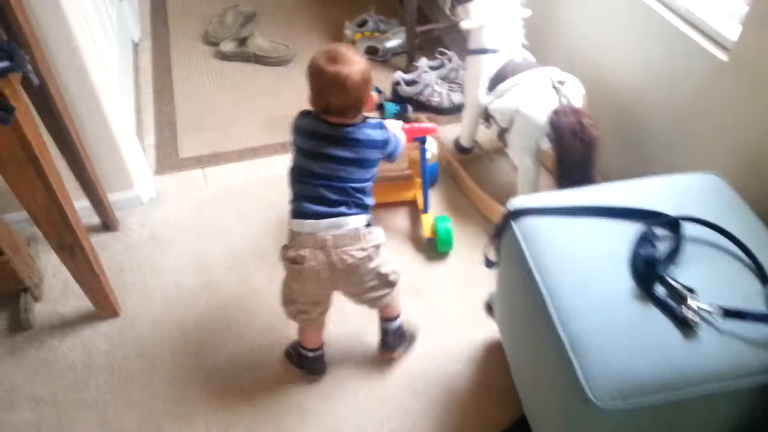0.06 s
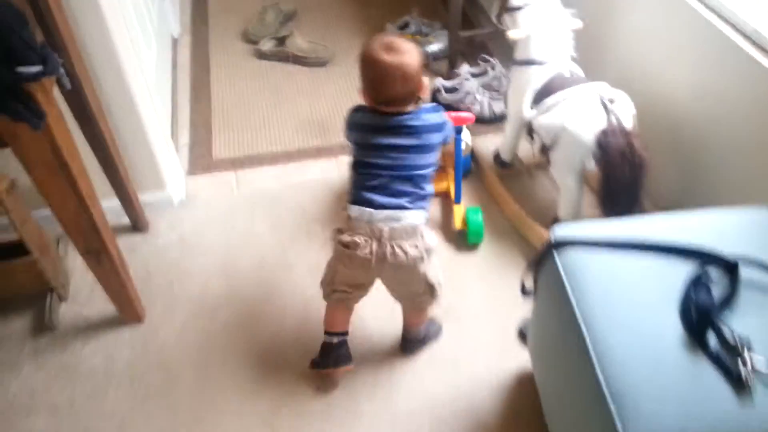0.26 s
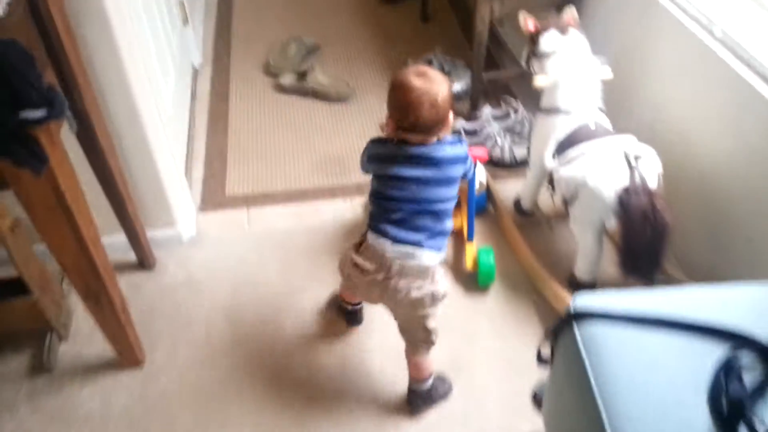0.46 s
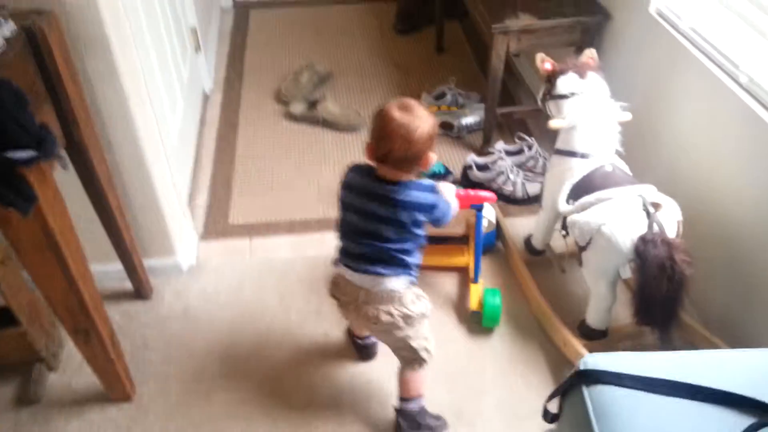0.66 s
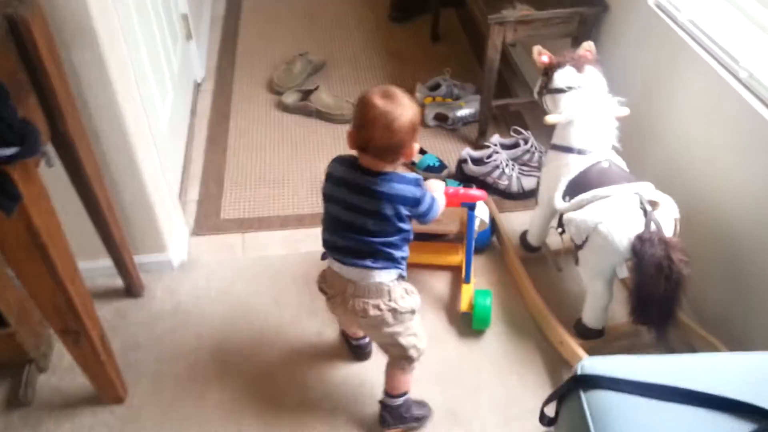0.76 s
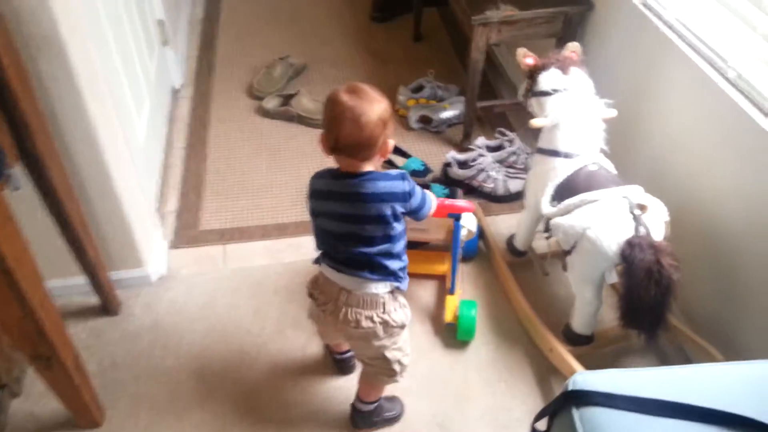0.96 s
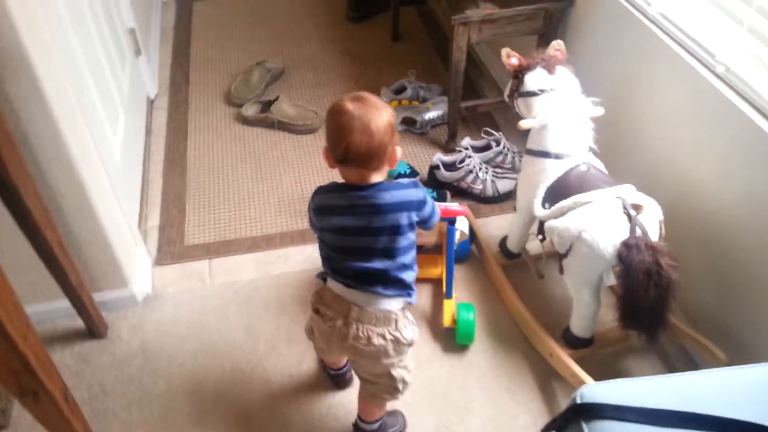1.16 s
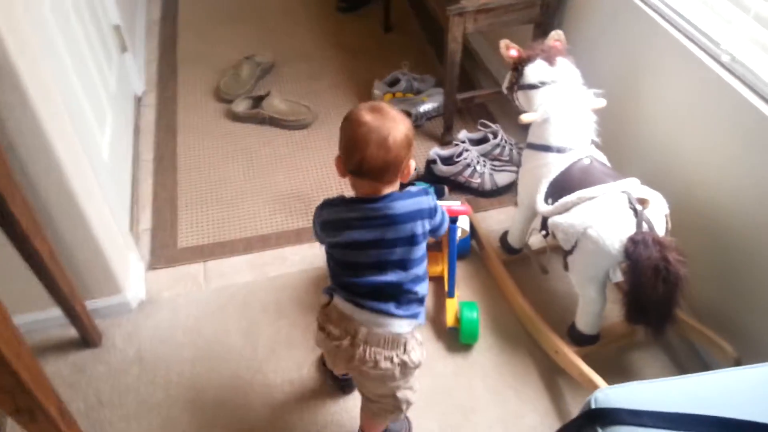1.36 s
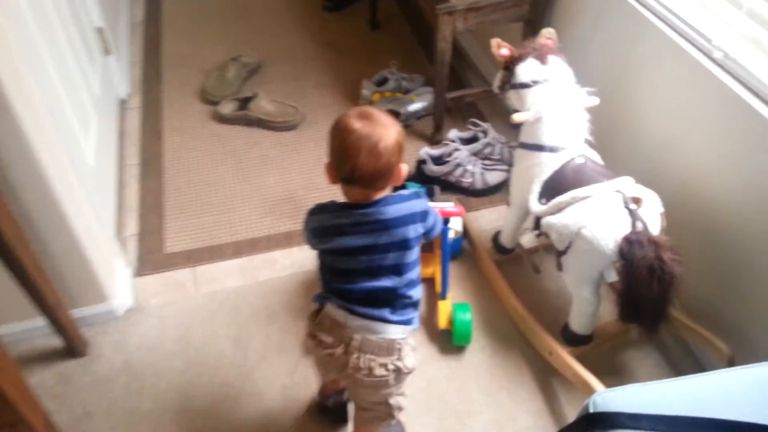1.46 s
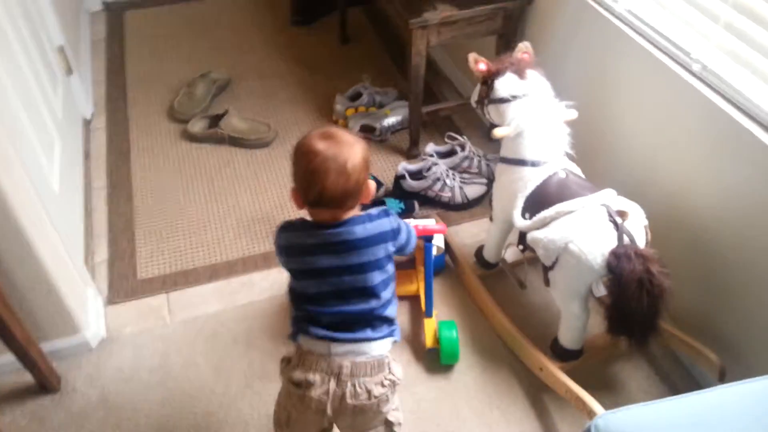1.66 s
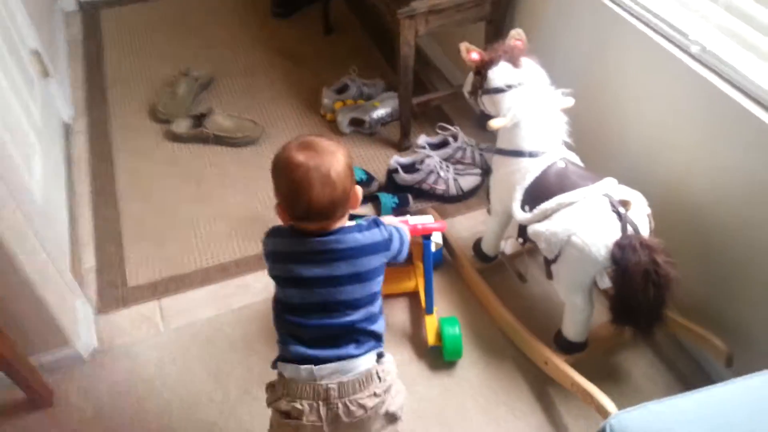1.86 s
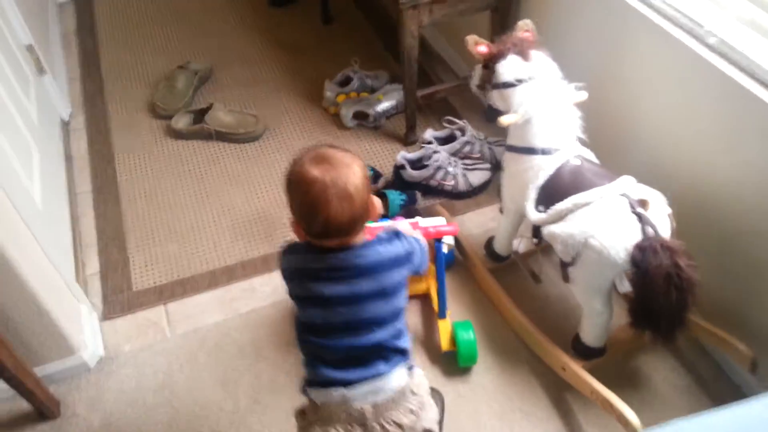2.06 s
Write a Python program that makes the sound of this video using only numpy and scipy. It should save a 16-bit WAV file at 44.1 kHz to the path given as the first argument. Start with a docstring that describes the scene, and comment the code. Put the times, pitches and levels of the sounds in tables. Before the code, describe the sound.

A toddler's rubber-soled shoes give four short, high squeaks in a small quiet room. Between them come soft footfalls, two brief rattles from a plastic push walker and faint scuffing, heard from close behind.

```python
"""A small quiet room: a toddler pushes a plastic walker across it, heard from just behind.
The shoes squeak four times as rubber sticks and slips. Soft footfalls ring the floor,
loose contacts rattle in the walker's hollow body, and wheels and soles scuff faintly.
Room air and a low hum lie underneath. Two close microphone ports give the stereo."""
import sys
import numpy as np
from scipy import signal
from scipy.fft import rfft, irfft
from scipy.io import wavfile

SR = 44100
rng = np.random.default_rng(int(sys.argv[2]) if len(sys.argv) > 2 else 0)


def digitize_waveform(pressure):
    """Quantize a signal to 16-bit integers and store it at the path in sys.argv[1].

    Rows of a 2-D input are taken as channels; values are limited to [-1, 1].
    """
    field = np.atleast_2d(pressure).T
    bounded = np.clip(field, -1, 1)
    quanta = np.round(bounded * 32767).astype(np.int16)
    wavfile.write(sys.argv[1], SR, quanta)


N = 92610

# Diffuse sound. Each row: frequency in Hz, left-right likeness from 0 to 1.
LIKENESS = [(50, 0.33), (250, 0.57), (600, 0.83), (1200, 0.15), (2500, 0.16), (6000, 0)]
# Room decay. Each row: frequency in Hz, T60 in seconds.
ROOM_T60_S = [(150, 0.31), (500, 0.46), (1000, 0.24), (4000, 0.22), (8000, 0.21), (14000, 0.21)]
# Room hum. Each row: frequency in Hz, level in dB.
HUM_TONES = [(118.4, -69.5), (188.4, -62), (214, -66)]
# Noise spectra; AIR includes microphone hiss. Each row: frequency in Hz, relative density in dB.
AIR_COLOUR = [(35, -56), (58, 0), (82, -7.5), (115, -6), (150, -2), (200, -5), (260, 1.5), (340, -2),
              (520, -11), (900, -11.5), (1600, -17), (4000, -18.5), (6300, -24), (10000, -21.5),
              (14500, -22)]
SCUFF_COLOUR = [(150, -12.5), (380, 7.5), (600, -4), (950, 4), (1500, -1.5), (2700, -0.5), (4400, -2),
                (5800, -13.5), (10000, -18.5), (14500, -35)]
SLAP_COLOUR = [(150, -52), (600, 10), (1300, 4), (1900, -8), (3300, -8), (4450, -1), (5300, -20),
               (14000, -27)]
BODY_COLOUR = [(50, -54), (100, -37), (200, -2), (330, 2.5), (640, -4), (980, 6), (1100, 0), (1380, 2.5),
               (1650, -6), (2800, -8), (4000, -14.5), (7000, -31.5), (14000, -67)]
CLACK_COLOUR = [(200, -25), (900, -11), (1900, -18), (2480, 5), (3050, -12), (3700, 0), (4000, 1),
                (4320, 2), (5200, -8.5), (9500, -14), (14000, -21)]
TICK_COLOUR = [(1000, 2), (4000, -3), (8000, -5), (11000, 8), (14000, -12)]
# Scuffing envelope. Each row: time in seconds, level in dB.
SCUFF_DB = [(0, -45), (.07, -48), (.13, -49.5), (.21, -49.5), (.3, -38), (.41, -46), (0.444, -61),
            (0.468, -46.5), (0.509, -64.5), (.6, -51), (.8, -49), (.87, -53), (1.0, -49.5), (1.08, -62.5),
            (1.19, -58), (1.3, -67), (1.58, -83), (1.702, -61), (1.949, -61), (2.1, -70)]
# Footfalls. Each row: start in seconds, level in dB.
STEPS = [(.203, -35.5), (0.282, -28.5), (.334, -33.5), (0.907, -44.5), (1.1252, -33.5), (1.149, -38),
         (1.839, -43.5)]
# Floor under a foot. Each row: frequency in Hz, gain in dB, T60 in seconds.
FLOOR_MODES = [(205, -32, 0.13), (395, 1, 0.066), (474, -4.5, 0.02), (671, -12.5, 0.069),
               (886, -8.5, 0.075), (1130, -16, 0.092), (1356, -10, 0.042)]
# Squeak gestures. Each row: time in seconds, slip rate in Hz, level in dB, rasp over tone in dB.
LEVEL_SQUEAK = [(.219, 988, -68, -12), (.223, 1005, -33.5, -25), (.238, 1008, -26.5, -25),
                (.258, 1007, -29, -16.5), (.267, 985, -31, -4), (.277, 977, -51, 5)]
CHIRP = [(.595, 1456, -45, 3), (.5985, 1333, -20.5, 3), (.6025, 1267, -20, 9.7), (.6035, 1213, -34, 7),
         (.61, 1157, -27, 6.3)]
FALLING_SQUEAK = [(.635, 4665, -34, -8), (.6405, 3770, -17.5, -10), (.6432, 3236, -20.5, -1.5),
                  (.6445, 1352, -16.5, -0.5), (.654, 1162, -20.5, -2.5), (.664, 1095, -26.5, -9.5),
                  (.680, 1048, -29.5, -10), (.705, 1011, -28.5, -14.5), (.717, 980, -33.5, -24),
                  (.729, 948, -48, -16)]
LATE_SQUEAK = [(1.753, 1337, -58, 1), (1.762, 1332, -41.5, -15), (1.779, 1325, -28.5, -19.5),
               (1.795, 1327, -28, -22), (1.812, 1315, -35, -20), (1.826, 1308, -44, -9)]
LATE_SLIDE = [(1.757, 1233, -43, 3.5), (1.792, 1296, -48, -6), (1.808, 1275, -34, -11.5),
              (1.822, 1242, -44.5, -12), (1.838, 1204, -46, -10)]  # second patch of sole in the late squeak, lower and rougher
# Squeak spectra. Each row: frequency in Hz, relative level of a partial there in dB.
LEVEL_COLOUR = [(1000, -3.5), (2000, -1.5), (3000, -2.5), (4000, 0.5), (5000, 1), (6000, -13), (7000, -14),
                (8000, -16), (9000, -13), (10000, -8), (11100, -13.5), (13000, -40)]
CHIRP_COLOUR = [(1250, -6), (1900, -9.5), (2550, -13.5), (2780, 5), (3080, -21), (3480, 7), (3750, -5.5),
                (3940, 7.5), (4200, -13), (4500, 4.5), (5400, -13.5), (7000, -8.5), (9600, -7.5),
                (14000, -26)]
FALLING_COLOUR = [(1000, 1.5), (1150, -2.5), (1330, -7), (2050, -5.5), (2450, -7.5), (3080, -4), (3500, 1),
                  (3930, .5), (4500, 1), (5400, -11), (7200, -7), (10000, -7), (12000, -14.5), (14500, -23)]
LATE_COLOUR = [(1000, -1.5), (1320, -4.5), (1650, -16), (2640, -6.5), (2950, -13), (3960, -5), (5280, -11),
               (6600, -23.5), (7900, -23.5), (9250, -10.5), (10560, -9), (11900, -14), (14500, -31)]
# Sliding patches of sole. Each row: gesture, spectrum, shimmer as a share, room tail in dB.
SQUEAKS = [(LEVEL_SQUEAK, LEVEL_COLOUR, 0.36, -1.5), (CHIRP, CHIRP_COLOUR, 0.34, -4.1),
           (FALLING_SQUEAK, FALLING_COLOUR, 0.3, -4), (LATE_SQUEAK, LATE_COLOUR, 0.058, -8.5),
           (LATE_SLIDE, LATE_COLOUR, 0.66, -3)]
# Rub noise low cut. Each row: share of the squeak spectrum's lowest frequency, level in dB.
RUB_LOW_CUT_DB = [(.25, -60), (.55, -42), (.78, -52)]
# Squeak phase between ports. Each row: frequency in Hz, left lead in radians.
PORT_LEAD_RAD = [(1000, 0.4), (1320, 0.54), (2050, 1.44), (2640, 1.5), (3050, 0.5), (4000, 1.55),
                 (5100, -1.4), (7000, -1.5), (10000, -1.77)]
# Walker knocks. Each row: start in seconds, body level in dB, clack level in dB, decay in seconds.
KNOCKS = [(.2795, -25, -36, 0.013), (.288, -26.5, -40, 0.016), (0.301, -53, -47, 0.015),
          (.311, -29, -42, 0.014), (0.334, -38, -62, 0.026), (.386, -36, -58, 0.019),
          (0.416, -56, -50.5, 0.074), (0.8874, -26, -51, 0.022), (.898, -27, -55, 0.01),
          (.909, -29.5, -67, 0.012), (.924, -33.5, -33, 0.018), (.937, -57, -31, 0.011),
          (.957, -45, -47, 0.0078)]
# Sole ticks. Each row: start in seconds, level in dB.
TICKS = [(1.7467, -39.5)]
# Port balance. Each row: frequency in Hz, left over right in dB.
BALANCE_DB = [(200, 0), (600, 0.5), (1500, 1.5), (4000, -1), (6500, 3), (10000, 1.5), (14000, 2)]

BAND_LIMIT_HZ = 14600


def amp(db):
    """Decibels to gain."""
    return 10 ** (np.asarray(db) / 20)


def unit(x):
    """Scales to rms 1."""
    return x / np.sqrt(np.mean(x ** 2) + 1e-20)


def read(table, hz):
    """Interpolates a table over log frequency."""
    table_hz, value = np.transpose(table)
    return np.interp(np.log(hz + 1), np.log(table_hz + 1), value)


def bins_hz(x):
    """FFT bin frequencies of x."""
    return np.fft.rfftfreq(x.shape[-1], 1 / SR)


def coloured(x, colour):
    """Filters x by a spectrum table, to rms 1."""
    return unit(irfft(rfft(x) * amp(read(colour, bins_hz(x))), x.shape[-1]))


def paired(x):
    """Makes two unrelated channels alike in the bass, as at two close ports."""
    left, other = rfft(x)
    likeness = read(LIKENESS, bins_hz(x))
    right = likeness * left + np.sqrt(1 - likeness ** 2) * other
    return irfft(np.array([left, right]), x.shape[-1])


def diffuse_noise(size):
    """White noise at the two ports."""
    return paired(rng.standard_normal((2, size)))


def waver(size, cutoff_hz):
    """Smooth random signal, rms about 1."""
    noise = rng.standard_normal(N)
    lowpass = np.exp(-(bins_hz(noise) / cutoff_hz) ** 2)
    return unit(irfft(rfft(noise) * lowpass, N))[:size]


def room(x, wet_db, onset_s=0.0049):
    """Direct sound plus a short diffuse tail."""
    hz, frame_s, spectra = signal.stft(diffuse_noise(SR), SR, nperseg=256)
    decay = amp(-60 * frame_s / read(ROOM_T60_S, hz)[:, None])
    response = signal.istft(spectra * decay, SR, nperseg=256)[1]
    t = np.arange(response.shape[1]) / SR
    response *= 1 - np.exp(-(t / onset_s) ** 2)
    response *= amp(wet_db) / np.linalg.norm(response, axis=1, keepdims=True)
    response[:, 0] += 1  # direct path
    return signal.fftconvolve(x, response / np.linalg.norm(response[0]), axes=1)[:, :N]


def air(noise_db=-56, wobble_hz=7):
    """Steady room noise and microphone hiss, with a wavering hum."""
    t = np.arange(N) / SR
    hum = np.zeros(N)
    for hz, db in HUM_TONES:
        swell = 1 + waver(N, wobble_hz)
        hum += amp(db) * unit(swell * np.sin(2 * np.pi * hz * t + waver(N, wobble_hz)))
    return hum + amp(noise_db) * coloured(diffuse_noise(N), AIR_COLOUR)


def scuffing(grain_db=0.7, grain_hz=120):
    """Wheels and soles brush the floor unevenly."""
    level_db = np.interp(np.arange(N) / SR, *np.transpose(SCUFF_DB)) + grain_db * waver(N, grain_hz)
    return amp(level_db) * coloured(diffuse_noise(N), SCUFF_COLOUR)


def footfalls(rise_s=0.0012, slap_db=-10, slap_decay_s=0.011):
    """Each step rings the damped floor, with a faint slap of the sole."""
    out, t = np.zeros((2, N)), np.arange(SR // 2) / SR
    ring = sum(amp(db - 60 * t / t60_s) * np.cos(2 * np.pi * hz * t) for hz, db, t60_s in FLOOR_MODES)
    ring *= 1 - np.exp(-t / rise_s)
    for start_s, db in STEPS:
        slap = coloured(diffuse_noise(len(t)), SLAP_COLOUR) * np.exp(-t / slap_decay_s)
        add(out, start_s, amp(db) * (ring + amp(slap_db) * slap))
    return out


def slip_tone(t, slip_hz, cycles, colour, shimmer, spread_cycles_per_octave,
              shimmer_hz=142, dull_db_per_octave_s=-35, fade_db_per_order=-4):
    """Repeated slips make a stack of partials that dulls as the sole settles."""
    order = np.arange(1, 16)[:, None]
    partial_hz, octaves = order * slip_hz, np.log2(order)
    dull_db = dull_db_per_octave_s * (t - t.mean()) * octaves
    purity = np.interp(slip_hz, [1750, 3000], [0, 1])  # very fast slipping is nearly a pure tone
    fade_db = fade_db_per_order * (order - 1) * purity
    gains = amp(read(colour, partial_hz) + dull_db + fade_db) * (partial_hz < BAND_LIMIT_HZ)
    gains /= np.sqrt((gains ** 2).sum(0) / 2)
    gains *= 1 + shimmer * np.array([waver(len(t), shimmer_hz) for _ in order])
    # The sole spreads each slip, delaying the treble.
    phase_rad = 2 * np.pi * order * (cycles - spread_cycles_per_octave * octaves)
    lead_rad = read(PORT_LEAD_RAD, partial_hz)
    return np.array([(gains * np.cos(phase_rad + side * lead_rad / 2)).sum(0) for side in (1, -1)])


def squeak(gesture, colour, shimmer, snag_share=0.0271, snag_hz=330, spread_s_per_octave=0.0007):
    """Rubber sticks and slips; rasp adds snags that slow the slips and a noise puff at each slip."""
    time_s, rate_hz, level_db, rasp_db = np.transpose(gesture)
    t = np.arange(time_s[0], time_s[-1], 1 / SR)
    level = amp(np.interp(t, time_s, level_db))
    rasp = amp(np.interp(t, time_s, rasp_db))
    slowing = snag_share * np.minimum(rasp, 1) * waver(len(t), snag_hz) ** 2
    slip_hz = np.interp(t, time_s, rate_hz) * (1 - slowing)
    cycles = np.cumsum(slip_hz) / SR
    tone = slip_tone(t, slip_hz, cycles, colour, shimmer, spread_s_per_octave * rate_hz[-1])
    puffs = diffuse_noise(N)[:, :len(t)] * (1 + np.cos(2 * np.pi * cycles))
    low_cut = [(share * colour[0][0], db) for share, db in RUB_LOW_CUT_DB]
    rub = coloured(puffs, low_cut + colour)
    out = np.zeros((2, N))
    add(out, time_s[0], level * (tone + rasp * rub) / np.sqrt(1 + rasp ** 2))
    return out


def walker(rise_s=0.00045, contacts_per_s=2500, low_cut_hz=150):
    """Each knock is a dying burst of loose contacts, with little bass."""
    out, t = np.zeros((2, N)), np.arange(SR // 2) / SR
    for start_s, body_db, clack_db, decay_s in KNOCKS:
        envelope = np.minimum(t / rise_s, 1) * np.exp(-t / decay_s)
        for db, colour in (body_db, BODY_COLOUR), (clack_db, CLACK_COLOUR):
            noise = rng.standard_normal((2, len(t)))
            contacts = unit(1. * (rng.random(len(t)) < contacts_per_s / SR))
            rattle = coloured(paired(noise * (1 + contacts)), colour)
            add(out, start_s, amp(db) * envelope * rattle)
    return signal.sosfilt(signal.butter(2, low_cut_hz, "highpass", fs=SR, output="sos"), out)


def sole_tick(decay_s=0.003):
    """A sole ticks just before the last squeak: a tiny burst of bright noise."""
    out, t = np.zeros((2, N)), np.arange(SR // 20) / SR
    for start_s, db in TICKS:
        noise = coloured(rng.standard_normal((2, len(t))), TICK_COLOUR)
        add(out, start_s, amp(db) * np.exp(-t / decay_s) * noise)
    return out


def add(mix, start_s, sound):
    """Mixes a sound in, cut at the end of the mix."""
    part = mix[:, round(start_s * SR):][:, :sound.shape[-1]]
    part += sound[..., :part.shape[1]]


def scene():
    """Squeaks, steps and knocks with room tails; tick, scuffing and air without."""
    squeaks = sum(room(squeak(gesture, colour, shimmer), wet_db)
                  for gesture, colour, shimmer, wet_db in SQUEAKS)
    shoes = squeaks + sole_tick() + room(footfalls(), wet_db=-3)
    return shoes + room(walker(), wet_db=-5.5) + scuffing() + air()


def record(dry):
    """Two ports, the left brighter, then the band limit."""
    tilt_db = np.array([[0.5], [-0.5]]) * read(BALANCE_DB, bins_hz(dry))
    ports = irfft(rfft(dry) * amp(tilt_db), N)
    lowpass = signal.firwin(255, BAND_LIMIT_HZ, window=("kaiser", 9), fs=SR)
    return signal.oaconvolve(ports, lowpass[None], "same")


dry = scene()
out = record(dry)
digitize_waveform(out)
```